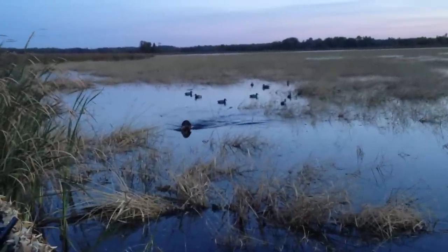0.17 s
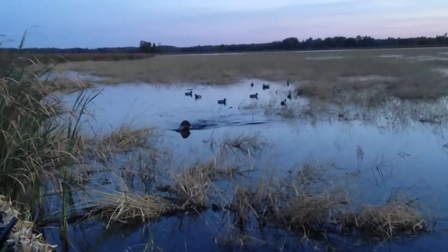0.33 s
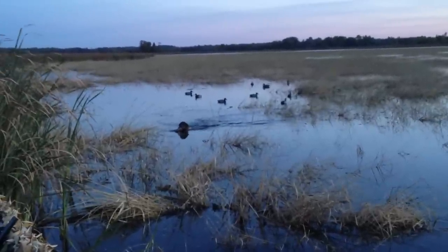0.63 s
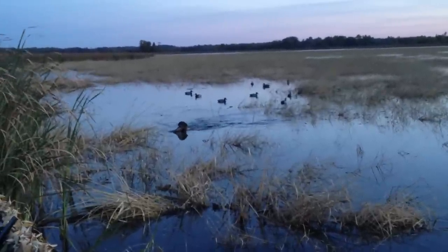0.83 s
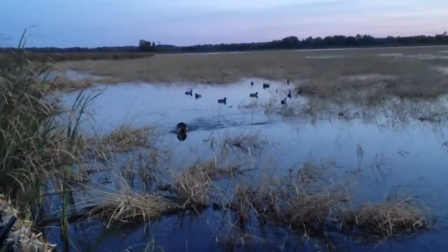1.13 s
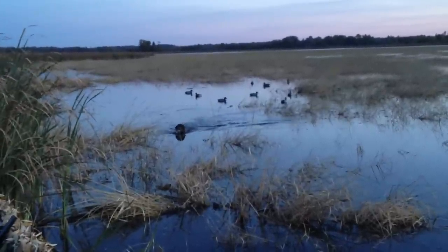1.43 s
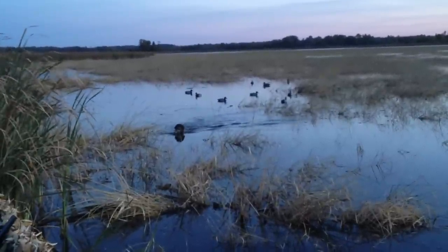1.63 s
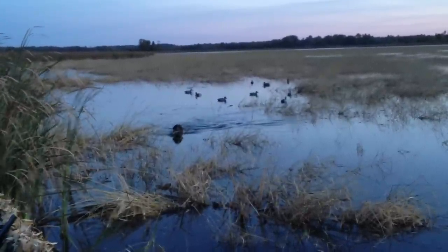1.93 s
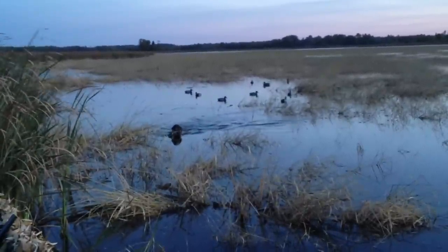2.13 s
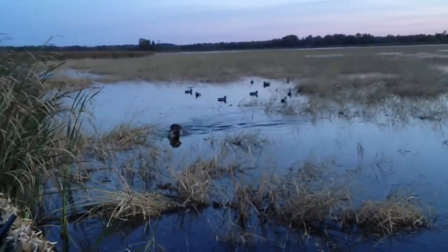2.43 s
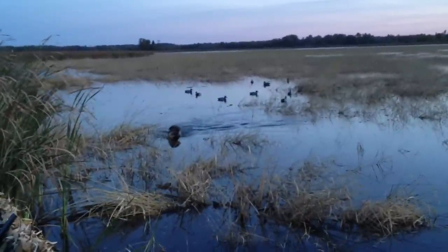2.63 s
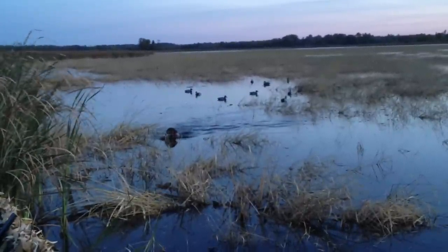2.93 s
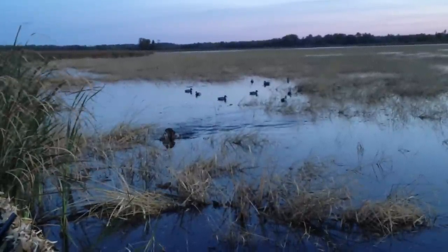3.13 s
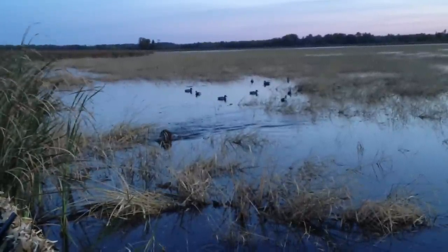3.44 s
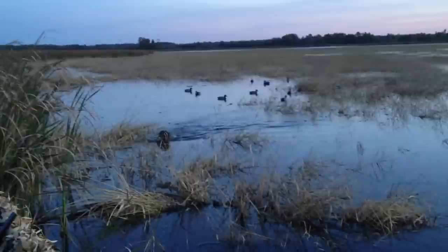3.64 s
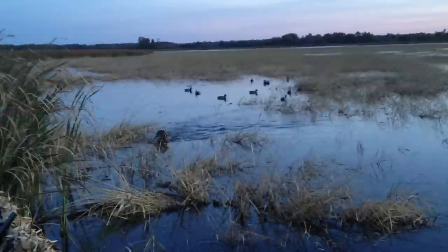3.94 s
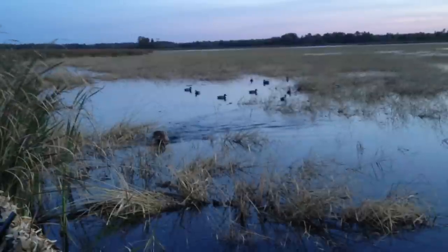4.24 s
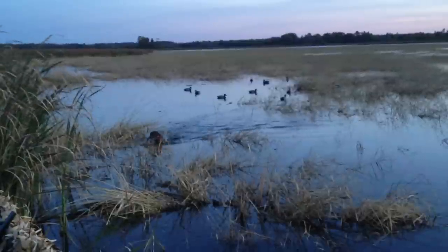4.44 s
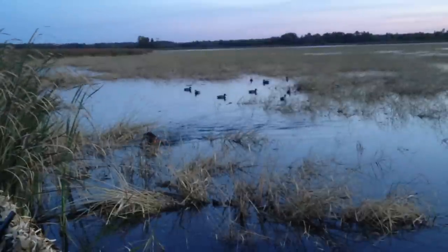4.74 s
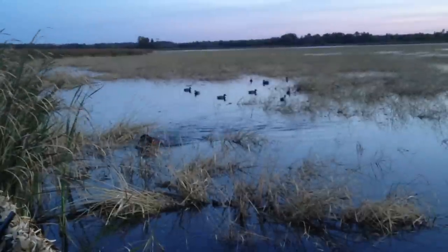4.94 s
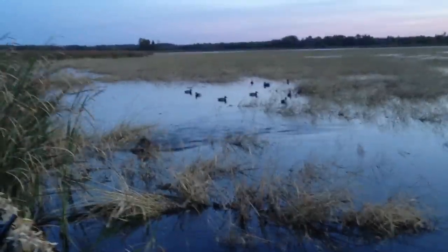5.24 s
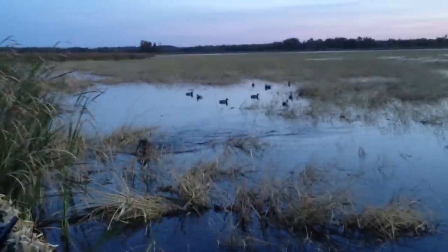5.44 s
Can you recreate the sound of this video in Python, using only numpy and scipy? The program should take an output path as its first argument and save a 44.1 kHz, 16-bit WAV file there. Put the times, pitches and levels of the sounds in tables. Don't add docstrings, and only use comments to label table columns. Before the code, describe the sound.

Wind thumps in low lumps on the microphone while an animal wades through a marsh, making small crisp splashes and drips.

```python
import sys
import numpy as np
from scipy import signal
from scipy.fft import rfft, irfft
from scipy.io import wavfile

SR = 44100
rng = np.random.default_rng(int(sys.argv[2]) if len(sys.argv) > 2 else 0)


def voltage_ratio(decibels):
    exponent = np.asarray(decibels, float) / 20
    return 10 ** exponent


def dump_mix(stems):
    frames = np.atleast_2d(stems).T
    limited = np.clip(frames, -1, 1)
    pcm = np.round(limited * 32767).astype(np.int16)
    wavfile.write(sys.argv[1], SR, pcm)


N = 246078


def rms_one(x):
    return x / np.sqrt(np.mean(x ** 2) + 1e-20)


def drift(rate_hz):
    r = np.exp(-40 * np.pi * rate_hz / SR)
    noise = rng.standard_normal(N // 20 + 2002)
    slow = signal.lfilter([1], [1, -2 * r, r * r], noise)[2000:]
    return np.interp(np.arange(N) / 20, np.arange(len(slow)), rms_one(slow))


def coloured(x, spectrum):
    hz, db = np.transpose(spectrum)
    log_hz = np.log(np.arange(1, N // 2 + 2) * SR / N)
    gain = voltage_ratio(np.interp(log_hz, np.log(hz), db))
    return rms_one(irfft(rfft(x) * gain, N))


def resonance(x, hz, width_hz):
    r = np.exp(-np.pi * width_hz / SR)
    top = np.array([1, 0, -1]) * (1 - r * r) / 2
    return signal.lfilter(top, [1, -2 * r * np.cos(2 * np.pi * hz / SR), r * r], x)


def double_resonance(x, hz, width_hz):
    return resonance(resonance(x, hz, width_hz), hz, width_hz)


def band_pass(x, order, low_hz, high_hz):
    return signal.sosfilt(signal.butter(order, [low_hz, high_hz], "band", fs=SR, output="sos"), x)


def add(out, s, sound):
    i = round(s * SR)
    out[i:i + len(sound)] += sound[:N - i]


# (time [s], tick peak [dB], colour [Hz], spray level [dB], treble [dB])
PAW_SLAPS = [(.66, -42, 4500, -43, -13), (.7415, -38, 5700, -42, 11), (.8515, -35.5, 2200, -48, 11),
             (1.1975, -38, 2700, -40, 3), (1.381, -28, 2700, -49, 4), (1.4017, -31, 2490, -50, -16),
             (1.6074, -23, 7300, -47, -3), (1.7447, -26, 5300, -46, 7), (2.0801, -23, 3720, -47, -17),
             (2.5893, -34, 2800, -43, -8), (3.1554, -31, 3260, -45, 1), (3.3766, -35, 3970, -47.5, 5),
             (3.5087, -32.5, 4160, -47.5, -22), (4.187, -17, 4700, -38, -10), (4.2833, -29, 2680, -52, -23),
             (4.4172, -27.5, 4400, -44.5, -17), (4.4432, -34, 5500, -47, 2), (4.5005, -32.5, 4780, -48, -8),
             (4.6464, -38, 3620, -41.5, 6), (5.4005, -30, 8900, -36.5, 8), (5.4325, -32, 5050, -40.5, 11.5),
             (5.4462, -27, 5000, -43, -10), (5.46, -23.5, 7200, -37, -16), (5.487, -28, 6940, -38, -9)]
# (time [s],
# tick peak [dB], colour [Hz], spray level [dB])
SMALL_TICKS = [(0.167, -40, 2250, -47), (.2677, -41, 4800, -47), (0.3124, -38, 4300, -43.5),
               (0.4535, -38, 10900, -46.5), (0.4948, -46, 1680, -53), (0.6894, -40, 3400, -51),
               (0.878, -36, 6300, -44.5), (1.0934, -35, 14120, -50), (1.1, -42, 6900, -45),
               (1.2583, -43, 7700, -48), (1.31, -40, 7170, -53), (1.3407, -47, 2500, -54),
               (1.5006, -39, 6950, -43), (1.531, -35, 3500, -44.5), (2.0166, -35, 4960, -40.5),
               (2.0495, -38, 3600, -43.5), (2.2017, -38, 4900, -46.5), (2.921, -37.5, 4000, -54),
               (2.9, -40, 2420, -52.5), (4.101, -45, 4860, -56), (4.1, -37, 3700, -50),
               (4.5166, -31.5, 4500, -52), (4.6308, -36, 4800, -42.5), (4.69, -48, 3900, -47),
               (4.8507, -41, 2940, -59), (4.9052, -35.5, 2220, -52), (5.0422, -37, 3100, -53),
               (5.348, -42, 5320, -55), (5.4106, -27, 7600, -41.5), (5.554, -41, 7800, -44),
               (4.1929, -26, 4200, -48), (2.578, -44, 7500, -45), (2.559, -44, 5000, -54),
               (1.356, -42, 3300, -54), (1.375, -42, 6000, -52), (1.419, -44, 4000, -52),
               (1.612, -33, 6500, -48), (4.409, -40, 5000, -54), (4.168, -46, 5000, -60),
               (4.237, -47, 8500, -60), (2.321, -45, 8400, -49.5), (2.16, -43, 7000, -65),
               (4.458, -41, 7100, -47.5), (5.4803, -29, 7300, -53), (2.262, -40, 3600, -49),
               (1.3812, -28, 7000, -48), (1.6088, -31, 2500, -49), (1.602, -43, 7500, -56),
               (1.9, -35.5, 1700, -55), (2.219, -44, 1200, -53)]


def slaps():
    rebound_s, rebound_db = 0.0058, -14
    spray_t60_s = 0.081
    tick_treble = 0.6
    out, t = np.zeros(N), np.arange(round(0.2 * SR)) / SR
    hits = [*PAW_SLAPS]
    for s, db, hz, spray_db in SMALL_TICKS:
        treble_db = -2 + 5 * np.log2(hz / 4000)
        hits.append((s, db, hz, spray_db, treble_db))
    noise = rng.standard_normal((len(hits), 2, len(t)))
    for (s, db, hz, spray_db, treble_db), (hiss, grit) in zip(hits, noise):
        tick = (t == t[20]) + 800 * hiss * t * voltage_ratio(-60 * t / 0.0022)
        lag = round(rebound_s * SR * (1 + 0.11 * np.tanh(grit[0])))
        tick = tick + voltage_ratio(rebound_db + 1.1 * grit[1]) * np.roll(tick, lag)
        crackle = hiss[::-1] * (0.47 + 0.21 * grit ** 2)
        raw = np.array([tick, crackle])
        body = band_pass(raw, 3, 1300, min(1.8 * hz, 10000))
        colour = resonance(resonance(raw, hz, 0.34 * hz), hz, 0.51 * hz)
        treble = voltage_ratio(treble_db - 6.5) * band_pass(raw, 1, 8000, 13000) * [[tick_treble], [1]]
        tick, spray = 0.94 * body + 1.1 * colour + treble
        fading = (1 - np.exp(-t / 0.0013)) * voltage_ratio(spray_db - 60 * t / spray_t60_s)
        add(out, s - 0.0005, voltage_ratio(db) * tick / np.abs(tick).max() + fading * rms_one(spray))
    return out


def droplets(spectrum, per_s, spread_db, patchy_db):
    born = rng.random(N) < per_s * voltage_ratio(patchy_db * drift(18)) / SR
    sizes = voltage_ratio(spread_db * np.minimum(rng.exponential(1, N), 4)) * rng.choice([-1, 1], N)
    return coloured(born * sizes, spectrum)


def gurgle(per_s, cycles):
    sizes = voltage_ratio(16.5 * np.minimum(rng.exponential(1, N), 3))
    born = (rng.random(N) < per_s / SR) * sizes
    pitches, dealt = np.geomspace(650, 4200, 18), rng.integers(0, 18, N)
    out = np.zeros(N)
    for k, hz in enumerate(pitches):
        out += double_resonance(born * (dealt == k) + 1e-18, hz, hz / cycles)
    return rms_one(out)


# (time [s], fizz level [dB])
STIRRING = [(0.0, -58.5), (0.23, -61), (0.4, -53.5), (0.62, -58), (0.87, -84), (1.12, -52.5), (1.27, -58),
            (1.46, -53), (1.69, -66.5), (1.88, -60.5), (1.97, -51.5), (2.19, -48), (2.35, -56), (3.08, -62),
            (3.78, -59), (4.38, -63), (5.17, -55), (5.5, -49)]
# (frequency [Hz], level per Hz [dB])
LOW_WASH_COLOUR = [(410, -53), (700, -20), (1120, -1.5), (1460, -4.5), (1740, -0.5), (2650, 0),
                   (5000, -7.5), (6500, -17), (11000, -120)]
# (frequency [Hz], level per Hz [dB])
FIZZ_COLOUR = [(1760, -8), (3000, -6.5), (3210, 0), (5450, -0.5), (8030, -0.5), (13500, -7.5),
               (15200, -8.5)]


def wash():
    stir_s, stir_db = np.transpose(STIRRING)
    fizz_db = np.interp(np.arange(N) / SR, stir_s, stir_db)
    wash_db = -66.5 + 0.74 * (fizz_db + 56)
    low = droplets(LOW_WASH_COLOUR, 5000, spread_db=3.0, patchy_db=1.5)
    high = droplets(FIZZ_COLOUR, 9000, spread_db=4.5, patchy_db=0.8)
    low = low + 0.63 * gurgle(350, cycles=26.0)
    return voltage_ratio(wash_db) * low + voltage_ratio(fizz_db - 2.5) * high


# (time [s], peak level [dB], pitch [Hz], decay t60 [s])
RINGING_BUBBLES = [
    (.16, -45.5, 2150, 0.041),
    (.325, -53, 705, 0.083),
    (0.495, -60, 3100, .08),
    (0.906, -62, 970, 0.03),
    (1.966, -44, 975, 0.025),
    (2.048, -44, 1190, 0.047),
    (3.262, -48.5, 2350, 0.046),
    (3.468, -56, 1600, 0.07),
    (3.727, -54.5, 1710, 0.065),
    (4.645, -42, 3644, 0.044),
]


def bubbles():
    out, t = np.zeros(N), np.arange(round(0.12 * SR)) / SR
    for s, db, hz, t60 in RINGING_BUBBLES:
        swell = (1 - np.exp(-t / 0.00023)) * voltage_ratio(db - 60 * t / t60)
        add(out, s, swell * np.sin(2 * np.pi * hz * (t + 2.0 * t ** 2)))
    return out


# (time [s], length [s], level [dB], centre [Hz], width
# [Hz])
SWISHES = [(0.876, 0.051, -57.5, 880, 570), (1.068, 0.052, -59, 11150, 800),
           (1.33, 0.05, -54, 3100, 1500), (2.102, 0.025, -58, 11000, 300),
           (2.168, 0.099, -59, 890, 650), (2.285, 0.068, -61, 820, 500),
           (3.606, 0.032, -61, 10900, 250), (4.685, 0.08, -57, 4760, 2600),
           (4.93, 0.076, -57.5, 4700, 800), (5.133, 0.16, -55, 7260, 3000),
           (3.756, 0.11, -58.5, 2700, 2800), (4.394, 0.036, -56, 3700, 6700),
           (1.68, 0.05, -59, 3000, 5000), (2.325, 0.04, -57, 2500, 1000),
           (2.619, 0.042, -60, 1300, 1500), (5.389, 0.13, -60, 550, 230),
           (2.697, 0.016, -46, 390, 150), (3.237, 0.024, -43, 444, 150),
           (1.48, 0.075, -55, 4500, 8000), (1.965, 0.05, -55, 4000, 7900),
           (0.002, 0.03, -57, 2000, 3000), (0.15, .035, -57, 2400, 1600), (2.24, .14, -58, 6000, 8000),
           (2.59, .07, -56, 6000, 7000), (3.42, .1, -61, 7800, 3000), (3.74, .08, -58, 10000, 9000),
           (1.85, .1, -58, 4500, 8000), (.22, .06, -60, 7000, 8000), (4.8, .07, -61, 7000, 6000),
           (1.62, .1, -61, 7000, 6000), (3.985, .1, -61, 6000, 8000), (5.49, .05, -56, 7000, 6000),
           (4.475, .035, -64, 11200, 500), (1.385, .045, -55, 3000, 3000), (4.1, .2, -66, 500, 400),
           (2.18, .055, -54, 1900, 1800), (1.955, .04, -57, 1300, 1400), (.275, .04, -57, 12500, 5000),
           (.31, .025, -55, 11000, 7000), (.63, .07, -60, 1200, 1200), (4.4, .13, -57, 7000, 10000),
           (1.5, .055, -57, 2200, 2500), (1.19, .04, -54, 6200, 3000)]


def swishes():
    out = np.zeros(N)
    noise = rng.standard_normal((len(SWISHES), SR // 4))
    for (s, length_s, db, hz, width_hz), hiss in zip(SWISHES, noise):
        gritty = hiss * np.abs(hiss) ** 0.72
        puff = double_resonance(gritty, hz, width_hz)[-round(length_s * SR):]
        add(out, s, voltage_ratio(db) * rms_one(puff) * np.sqrt(np.hanning(len(puff))))
    return out


# (peak time [s], rumble level [dB], rise [s], fall [s])
WIND_GUSTS = [(0.089, -51.5, 0.31, 0.23), (.26, -57, 0.032, 0.24), (0.461, -22, 0.051, 0.043),
              (.585, -47, 0.09, 0.16), (.72, -54.5, 0.14, 0.13), (.86, -56, 0.17, 0.24),
              (1.05, -58.5, 0.12, 0.21), (1.21, -65, 0.05, 0.05), (1.835, -47, 0.026, 0.094),
              (1.96, -38, 0.021, 0.26), (2.09, -29, 0.19, .14), (2.354, -31.5, 0.15, 0.37),
              (2.628, -35, 0.046, 0.039), (2.716, -29.5, 0.046, 0.039), (2.819, -32.5, 0.076, 0.068),
              (2.98, -54.5, 0.16, 0.07), (3.156, -32.5, 0.074, 0.14), (3.24, -29, 0.15, 0.099),
              (3.672, -51, 0.028, 0.54), (3.813, -33.5, 0.031, 0.15), (3.961, -45.5, 0.073, 0.26),
              (4.5, -35.5, 0.069, 0.057), (4.596, -26, 0.05, 0.1), (4.675, -19, 0.027, 0.038),
              (4.76, -54, 0.11, 0.66), (4.998, -25.5, 0.071, .15), (5.09, -23, .15, 0.19),
              (5.205, -29, 0.16, 0.099), (5.3, -48, 0.13, 0.43), (5.575, -37.5, 0.28, 0.11)]


def gust_level():
    swing_db = 30
    rounding = 0.79
    t = np.arange(0, N / SR + 0.01, 0.002)
    power = np.zeros(len(t))
    for s, db, rise_s, fall_s in WIND_GUSTS:
        away = np.maximum((s - t) / rise_s, (t - s) / fall_s)
        power += voltage_ratio(2 * (db - swing_db * away ** rounding))
    return np.interp(np.arange(N) / SR, t, 10 * np.log10(power + 1e-9))


# (centre time [s], level [dB],
# pitch [Hz], width [ms])
EDDIES = [(0.422, -25, 204, 8.7), (0.437, -27, 197, 7.1), (0.462, -17.5, 176.5, 9.7),
          (0.486, -27.5, 149, 9.4), (0.5815, -28.5, 165, 8), (1.961, -23, 153, 8.7),
          (2.011, -19.5, 200, 7.4), (2.027, -23, 190, 8), (2.069, -20, 228, 7), (2.106, -21.5, 206, 11),
          (2.139, -21.5, 174, 9.7), (2.343, -25, 240, 10), (2.3625, -16, 235, 8), (2.383, -23, 182, 9),
          (2.43, -23, 167, 10), (2.463, -25, 260, 6), (2.815, -25.5, 192, 6.2), (3.2, -22, 260, 6.5),
          (3.216, -20, 153, 13.7), (3.238, -20, 215, 7), (3.815, -25, 183, 12.3), (4.607, -26, 199, 8),
          (4.67, -27, 160, 9), (4.975, -23.5, 224, 7.1), (5.005, -16.5, 184, 11),
          (5.062, -22, 205, 7.4), (5.164, -19, 185, 8), (5.208, -14, 215, 9), (5.226, -20, 206, 9.5),
          (5.571, -24, 147, 19.65), (2.094, -22, 205, 8), (2.124, -27.5, 292, 7.1),
          (2.402, -33, 214, 10), (3.1745, -25, 220, 6.5), (4.591, -26, 212, 9.8),
          (4.624, -26.5, 216, 12), (4.991, -20, 181, 7.5), (5.021, -23.5, 200, 9),
          (5.041, -28, 217, 12), (5.177, -29, 200, 8.9), (5.196, -18, 200, 7.5), (5.545, -31, 168, 18),
          (2.71, -30, 300, 7), (0.454, -26, 244, 8.8), (.669, -45, 170, 11), (.822, -48, 139, 10.6),
          (.97, -49, 160, 8), (2.975, -44, 149, 16), (2.995, -51, 158, 10), (.477, -32, 330, 7)]
# (centre time [s], level [dB], pitch [Hz], width [ms])
MORE_EDDIES = [(.43, -32, 240, 5), (2.036, -26, 190, 8), (2.048, -29, 260, 7), (2.078, -22, 230, 7),
               (2.164, -32, 230, 6), (2.332, -32, 200, 8), (2.3555, -22, 235, 6.5), (2.392, -28, 200, 7),
               (2.472, -31, 170, 10), (3.13, -36, 180, 8), (3.183, -27, 200, 7), (3.191, -26, 220, 6),
               (3.246, -24, 260, 6.5), (3.259, -30, 300, 8), (4.599, -28, 220, 6), (4.68, -27, 170, 9),
               (4.998, -20, 190, 7), (5.086, -32, 330, 5), (5.108, -33, 260, 6), (5.15, -35, 250, 7),
               (.885, -50, 100, 14), (1.09, -54, 130, 12), (1.122, -55, 85, 16), (1.218, -54, 185, 14),
               (1.79, -55, 120, 16), (3.11, -44, 190, 14), (1.68, -60, 90, 16)]
# (centre time [s], level [dB], pitch [Hz])
STRAY_EDDIES = [(0.031, -38, 136), (0.07, -39.5, 172), (0.132, -44.5, 160), (0.232, -34.5, 137),
                (.286, -40.5, 177), (0.52, -36, 188), (0.618, -36, 174), (0.725, -48, 133),
                (0.985, -50, 150), (1.048, -42.5, 139), (1.836, -38.5, 147), (1.921, -39, 155),
                (2.307, -33, 178), (2.534, -39, 150), (2.57, -43, 158), (2.627, -31.5, 220),
                (2.72, -28, 212), (2.763, -33.5, 164), (3.152, -28, 183), (3.281, -29, 212),
                (3.324, -32.5, 159), (3.682, -36.5, 161.5), (3.728, -34, 174), (3.831, -28, 250),
                (3.964, -36.5, 201), (4.444, -32.5, 164), (4.493, -29.5, 180), (5.094, -27, 236),
                (5.377, -41, 163), (5.509, -30, 177), (.567, -35, 179), (1.907, -39.5, 176),
                (1.992, -35, 193), (2.183, -40, 154), (2.287, -35, 154), (2.45, -31, 205),
                (2.505, -35.5, 147), (2.638, -38, 179), (2.772, -34, 184), (2.84, -33, 173),
                (2.85, -38, 191), (3.088, -42, 174), (3.301, -34.5, 144), (3.34, -41, 182),
                (3.352, -41, 144), (3.715, -40, 194), (3.765, -40.5, 204), (3.782, -38, 166),
                (3.799, -41, 166), (4.467, -40, 212), (4.573, -39, 165), (4.697, -33, 204),
                (5.074, -30, 206), (5.117, -30, 274), (5.132, -34, 168), (5.273, -39, 146),
                (5.393, -39.5, 181.5), (5.526, -29.5, 160), (.326, -48, 140)]


def eddies(gust_db):
    gap_s, clearance_s = 0.027, 0.017
    least_db, top_db = -60, -39
    small_width_ms = 12.5
    listed = [*EDDIES, *MORE_EDDIES]
    grid = np.arange(gap_s, N / SR - gap_s, gap_s)
    chance = rng.standard_normal((len(grid), 3))
    s = grid + gap_s * np.tanh(chance[:, 0]) / 3
    db = np.minimum(gust_db[(s * SR).astype(int)] + 2.5, top_db) + 2.5 * chance[:, 1]
    hz = np.maximum(166 + 1 * (db + 45) + 22 * chance[:, 2], 90)
    taken_s = [row[0] for row in [*listed, *STRAY_EDDIES]]
    crowded = np.abs(s[:, None] - taken_s).min(axis=1) < clearance_s
    flurry = np.transpose([s, db, hz])[~crowded & (db > least_db)]
    return listed + [(s, db, hz, small_width_ms) for s, db, hz in [*STRAY_EDDIES, *flurry]]


# (frequency [Hz], level per Hz [dB])
RUMBLE_COLOUR = [(12, -64), (20, -25), (48, -40), (112, 10.5), (184, -2), (328, -6), (358, -3.5),
                 (612, -28), (700, -38), (910, -71), (1540, -120)]


def wind(lumpy_db, edge_share):
    rumble_top_db = -40
    skew, sag = 0.68, 0.26
    lag_s, dip_turns = 0.0002, 0.1
    gust_db = gust_level()
    lumps = voltage_ratio(lumpy_db * drift(35.0)) * coloured(rng.standard_normal(N), RUMBLE_COLOUR)
    out = voltage_ratio(np.minimum(gust_db, rumble_top_db) - 1.0) * rms_one(lumps)
    for (s, db, hz, width_ms), chance in zip(eddies(gust_db), rng.random((300, 2))):
        t = np.arange(round(0.002 * width_ms * SR)) / SR
        swell = np.sin(np.pi * (t / t[-1]) ** skew) ** 2
        heart_s = t[-1] * 0.5 ** (1 / skew)
        from_heart = t - heart_s
        waver = 0.061 * np.sin(2 * np.pi * (0.372 * hz * t + chance[1]))
        turns = hz * from_heart * (1 - sag * from_heart / t[-1]) + waver
        turns = turns - dip_turns + 0.2 * (chance[0] - 0.5)
        suction = -voltage_ratio(db - 2.0) * swell * np.cos(2 * np.pi * turns)
        add(out, s - heart_s + lag_s, suction)
    overtones = band_pass(np.maximum(out, 0) ** 2, 2, 380, 1100)
    bass_cut = signal.butter(2, 100, "high", fs=SR, output="sos")
    return signal.sosfilt(bass_cut, out + edge_share * overtones)


# (frequency [Hz], level per Hz [dB])
AIR_COLOUR = [(15, -47), (25, -42), (55, -48), (130, -7), (220, 4), (817, -3.5), (3480, -5), (5340, -7.5),
              (7990, -4.5), (9900, -11), (12600, -7), (15200, -14)]


def still_air():
    flutter = voltage_ratio(1.6 * drift(21.6))
    return voltage_ratio(-59) * coloured(flutter * rng.standard_normal(N), AIR_COLOUR)


def scene():
    water = slaps() + wash() + bubbles() + swishes()
    return (water + wind(lumpy_db=3.8, edge_share=6.5) + still_air())[None]


def roll_off(x):
    return signal.sosfilt(signal.butter(12, 16450, fs=SR, output="sos"), x)


def record(dry):
    top_cut = signal.ellip(8, 0.5, 48, 15330, fs=SR, output="sos")
    return roll_off(signal.sosfilt(top_cut, dry))


dry = scene()
out = record(dry)
dump_mix(out)
```